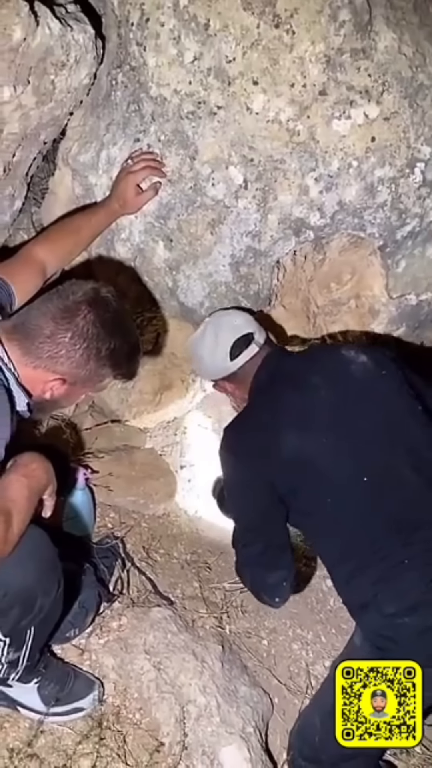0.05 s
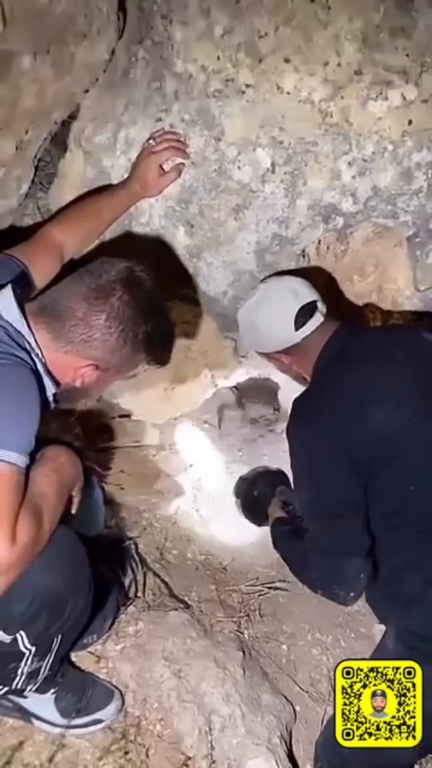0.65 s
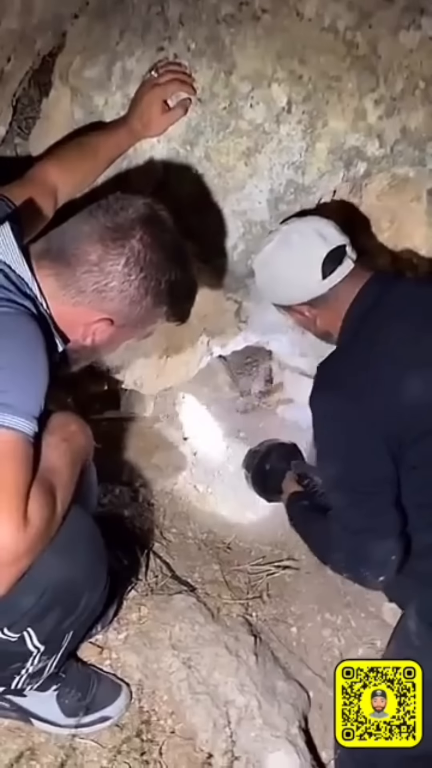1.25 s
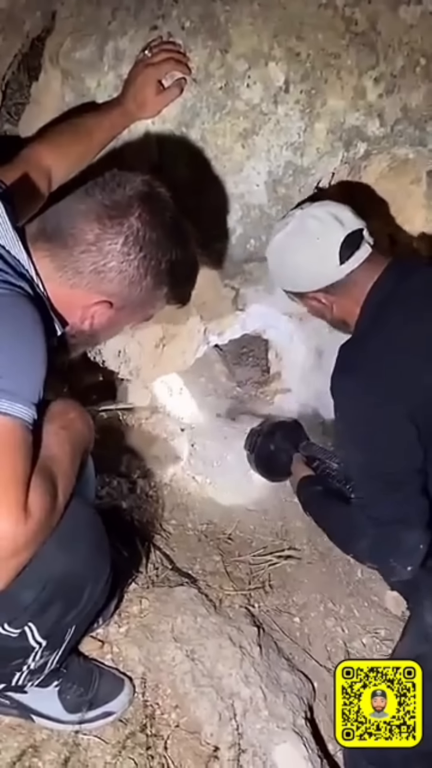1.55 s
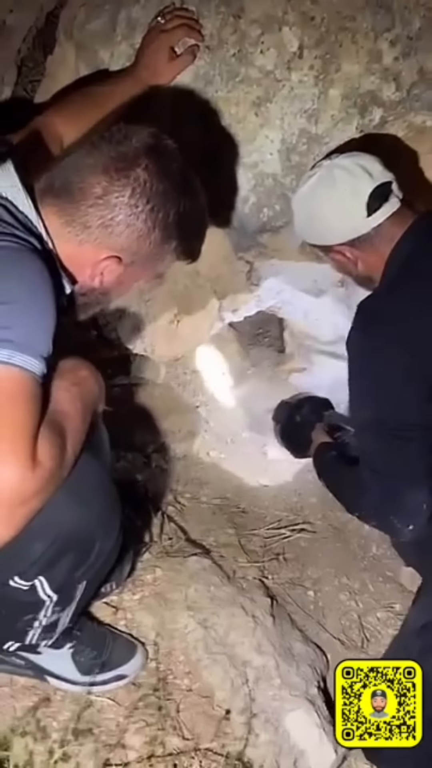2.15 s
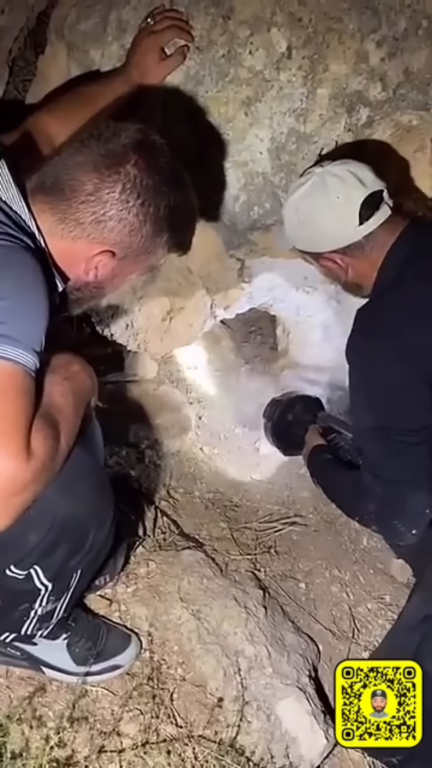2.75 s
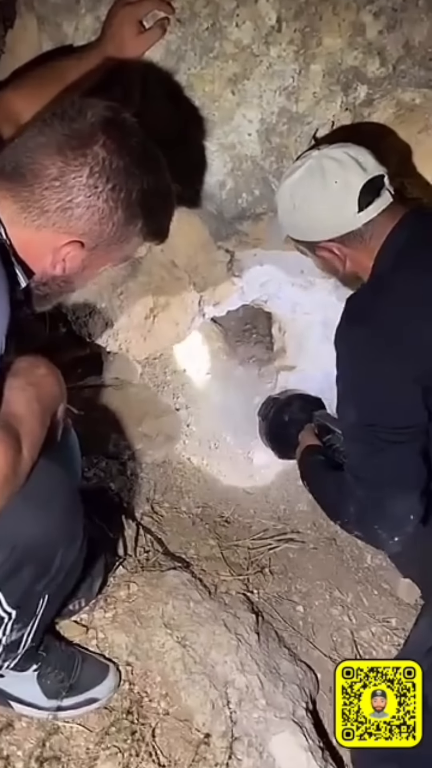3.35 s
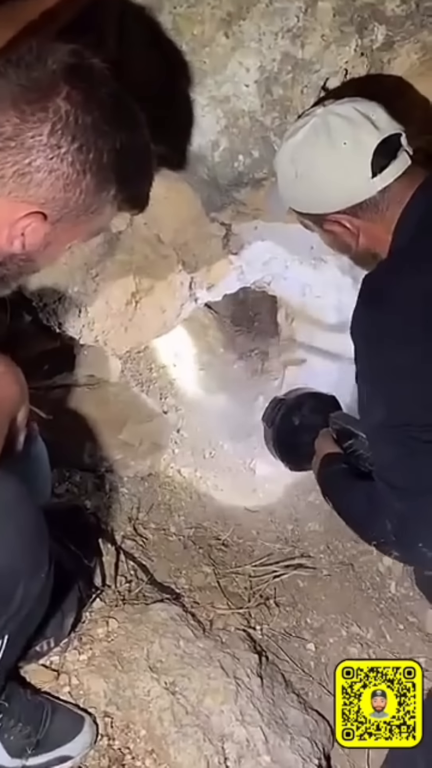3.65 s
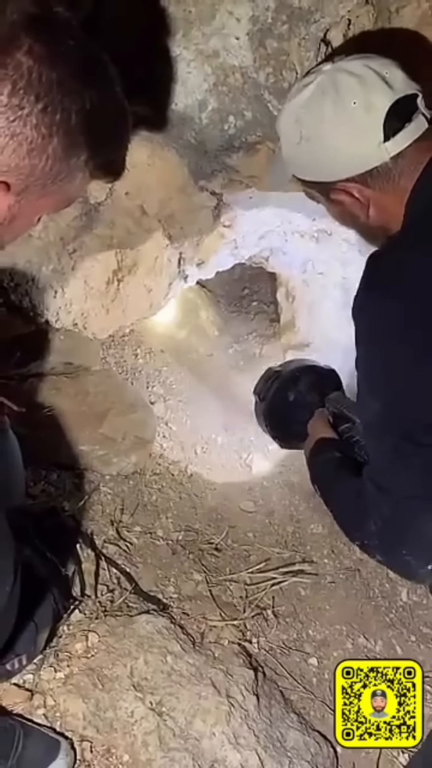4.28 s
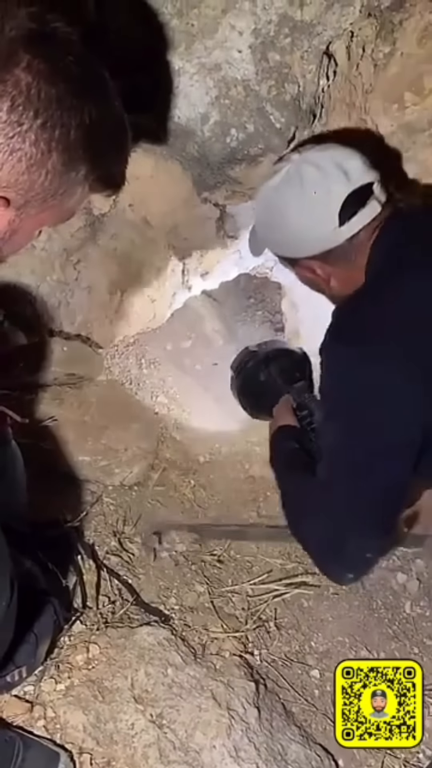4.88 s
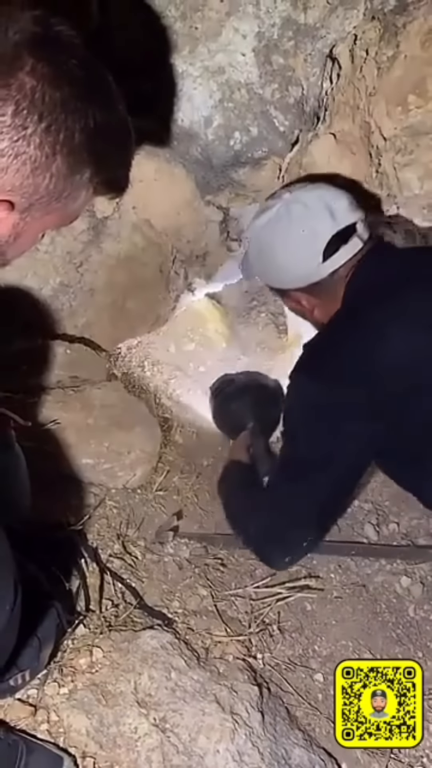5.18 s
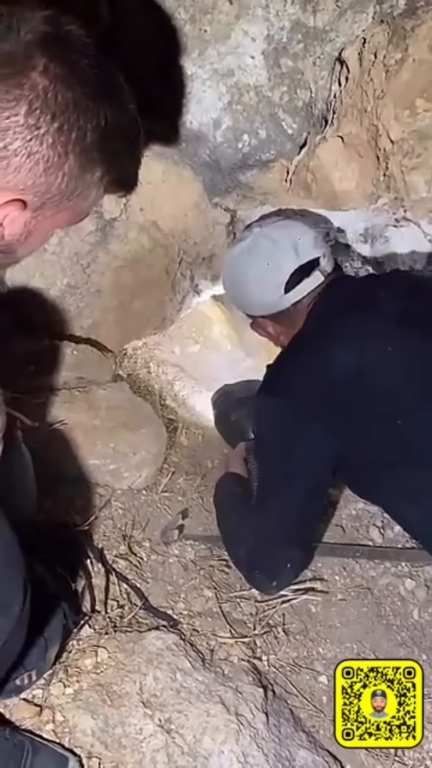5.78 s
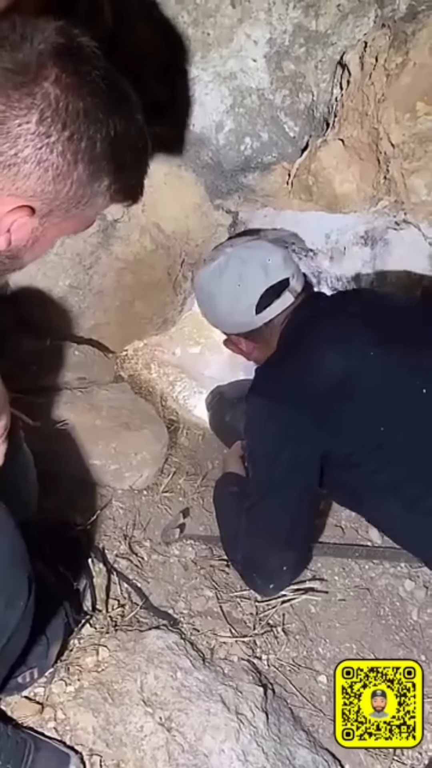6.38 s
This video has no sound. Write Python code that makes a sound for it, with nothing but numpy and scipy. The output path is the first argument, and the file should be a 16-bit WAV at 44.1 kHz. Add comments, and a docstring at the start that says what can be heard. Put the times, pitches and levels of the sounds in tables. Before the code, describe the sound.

A steel bar is worked into an opening in a rock face outdoors. Light scrapes and clinks lead to one sharp knock, then a quick cluster of louder crunching blows with short metallic rings and dull thuds. Softer taps follow, and small stone chips click brightly toward the end. Between the knocks, rubble shifts with a faint low rumble and dry grit trickles. The sound is close and fairly dry.

```python
"""Prying stones from a rock face

Outdoors at night, a steel bar is worked into an opening in the rock. Each knock crushes stone and
excites the bar's bending modes; the heavier ones thud through the ground. Each shove makes the rubble
in the hollow give way and settle; dry grit trickles, chips click and thin flakes ping."""
import sys
import numpy as np
from scipy import signal
from scipy.fft import rfft, irfft, next_fast_len
from scipy.io import wavfile

SR = 44100
rng = np.random.default_rng(int(sys.argv[2]) if len(sys.argv) > 2 else 0)


def store_pcm(level_fs):
    """Save levels as 16-bit WAV."""
    pcm = np.round(np.clip(level_fs, -1, 1) * 32767).astype(np.int16)
    wavfile.write(sys.argv[1], SR, np.atleast_2d(pcm).T)


N = 283456
AGE = np.arange(SR) / SR   # seconds since a blow
SHORT_AGE = AGE[:8192]

# Blows of bar on stone: start_s, crunch_db, crack_db, contact_t60_s, stone_hz, ring_db,
# freedom (0 wedged, 1 free), favoured_hz
BLOWS = [(0.094, -46.5, -43.5, 0.1, 1120, -42, 0.36, 5702),
         (0.148, -36.5, -38, 0.066, 1050, -27.5, 0.19, 1110), (.181, -43, -44, 0.049, 900, -42, 0.13, 1128),
         (0.19, -36.5, -34, 0.037, 1120, -39, 0.2, 4000), (.661, -40.5, -24.5, 0.045, 2240, -41, 0.3, 5300),
         (0.667, -37, -51, .026, 1090, -23.5, 0.03, 2900), (.72, -46, -42.5, 0.076, 1510, -52, 0.37, 2900),
         (0.775, -47.5, -46, 0.037, 1530, -42.5, 0.27, 2204),
         (0.872, -47, -43.5, 0.032, 1310, -41, 0.088, 1629),
         (1.2379, -9.5, -20.5, 0.013, 2300, -37.5, 0.3, 2320),
         (1.367, -43.5, -37, 0.047, 1590, -28, 0.1, 5702), (1.534, -62, -44, 0.062, 2000, -42, 0.1, 4527),
         (1.563, -50, -39.5, 0.032, 1970, -44, .15, 5702), (1.682, -50, -44, .2, 2000, -43, .56, 4527),
         (1.705, -30, -35.5, 0.035, 2200, -43.5, 0.68, 2900),
         (1.748, -47, -37.5, 0.19, 1340, -46, 0.12, 12595),
         (1.763, -32, -61, 0.026, 696, -35.5, 0.17, 1629), (1.856, -68, -43, 0.026, 2000, -43, 0.18, 5702),
         (2.2345, -28, -25, 0.041, 1180, -21.5, 0.4, 6540),
         (2.3532, -27.5, -25, 0.073, 1080, -28.5, 0.25, 1629),
         (2.402, -33.5, -22.5, 0.058, 765, -28.5, 0.11, 3178),
         (2.4146, -16.5, -13.5, 0.027, 2920, -27.5, 0.35, 3178),
         (2.42, -25, -7.5, 0.027, 766, -24, 0.12, 5702),
         (2.47, -31.5, -31.5, 0.09, 1400, -15.5, 0.12, 5930),
         (2.48, -35, -32.5, 0.16, 1250, -40.5, 0.7, 1520),
         (2.5176, -23.5, -29.5, 0.072, 1740, -16.5, 0.16, 1497),
         (2.735, -49, -42.5, 0.16, 1570, -49, 0.22, 1629),
         (2.9988, -19, -21.5, 0.03, 1020, -26.5, 0.18, 2204),
         (3.126, -37, -33.5, .049, 2310, -26.5, 0.13, 2220), (3.847, -56, -35, 0.075, 1500, -53, .12, 5600),
         (3.959, -39.5, -38, 0.078, 1140, -42, .12, 1128),
         (3.987, -48, -29.5, 0.038, 1330, -57, 0.082, 4830), (4.04, -43, -37, 0.027, 840, -49, 0.21, 3010),
         (4.7009, -44.5, -34, 0.34, 2200, -34, 0.21, 4830), (4.7242, -33, -22.5, .05, 2400, -19, .95, 5443),
         (4.865, -44.5, -37, 0.097, 1470, -46.5, 0.71, 3957),
         (5.024, -45.5, -41, 0.15, 1270, -31, 0.24, 7850), (5.051, -43, -38, 0.08, 800, -38, 0.1, 1629),
         (5.259, -54, -54, 0.16, 2090, -61, .07, 2204)]
def knocks():
    """Impact excitation: each blow drives both bodies, so the stone crunches and the steel rings."""
    stone, steel = np.zeros((2, N))
    for start_s, crunch_db, crack_db, contact_t60, stone_hz, ring_db, freedom, favoured_hz in BLOWS:
        add(stone, start_s, contact(crunch_db, crack_db, contact_t60, stone_hz))
        add(steel, start_s, bar_ring(ring_db, freedom, favoured_hz, contact_t60))
    return stone, steel


# Bending modes of the free bar: pitch_hz, level_db, t60_s
BAR_MODES = [(158, -17, 1.5), (715, -15, .3), (904, -14, .95), (1128, -12, .6), (1497, -8, .65),
             (1629, -3, .95), (2204, -8, .5), (2266, -9, .7), (2900, -16, .75), (3010, -15, .5),
             (3178, -9, .38), (3957, -10, .55), (4527, -13, .6), (4830, -7, .36), (5443, -7, .27),
             (5702, 0, .32), (5911, -8, .45), (6236, -7, .25), (6640, -5, .27), (7074, -14, .4),
             (7412, -16, .35), (7850, -10, .42), (8500, -14, .42), (8812, -12, .35), (9080, -10, .4),
             (9776, -10, .18), (10225, -5, .22), (10680, -14, .35), (11400, -14, .2), (12595, -5, .19)]
def bar_ring(ring_db, freedom, favoured_hz, contact_t60):
    """Modal vibration: the contact point favours one mode and its neighbours; the rock damps all."""
    hz, db, t60 = np.transpose(BAR_MODES)
    octaves = np.abs(np.log2(hz / favoured_hz))
    favoured_db, falloff_db = 7, 6.5
    db = np.where(octaves == octaves.min(), favoured_db, db - falloff_db * np.tanh(octaves))
    gain = from_db(db + 2 * rng.standard_normal(len(hz)))
    gain = np.sqrt(2) * from_db(ring_db) * gain / np.linalg.norm(gain)
    freedom = np.clip(freedom, .05, 1)
    hz = hz * (1 + .004 * (1 - freedom) * rng.standard_normal(len(hz)))   # pressure detunes the modes
    age = AGE[:int(freedom * SR)]
    phase = 2 * np.pi * (hz[:, None] * age + rng.random((len(hz), 1)))
    modes = np.sin(phase) * np.exp(-np.log(1000) * age / (freedom * t60[:, None]))
    build_up = 1 - np.exp(-age / (0.13 * max(contact_t60, 1e-3)))
    choke = np.exp(-(age / (.37 * freedom)) ** 6)   # the bar comes to rest on the rock
    return gain @ modes * choke * build_up


def through_bar(spectrum, width_hz, lift_db):
    """Resonant filtering: the pressed bar adds its broadened modes to a spectrum; returns hz, db."""
    points_hz, points_db = np.transpose(spectrum)
    hz = np.arange(points_hz[0], points_hz[-1], 20)
    mode_hz, mode_db, _ = np.transpose(BAR_MODES)
    peak_power = from_db(lift_db + mode_db / 2) ** 2   # the squeeze evens out strong and weak modes
    peaks = peak_power / (1 + (2 * (hz[:, None] - mode_hz) / width_hz) ** 2)
    base_db = np.interp(np.log(hz), np.log(points_hz), points_db)
    return hz, base_db + 10 * np.log10(1 + peaks.sum(axis=1))


# Spectra of the dull crunch and the bright crack: frequency_hz, level_db
CRUNCH_SPECTRUM = [(150, -5.5), (420, -5), (750, 0), (1100, -6), (1550, -7), (2300, -4.5), (2900, -10),
                   (3600, -27.5), (7000, -37.5)]
CRACK_SPECTRUM = [(1500, -23), (3600, -1.5), (4600, -1), (5800, -5), (7500, -0.5), (10000, -3), (13000, 4),
                  (16000, 4)]
def contact(crunch_db, crack_db, t60, stone_hz, stone_db=6, stone_octaves=.2):
    """Brittle fracture: steel crushes the surface in a shower of clicks, coloured by bar and stone."""
    size = len(SHORT_AGE)
    hz, db = through_bar(CRUNCH_SPECTRUM, width_hz=38, lift_db=18)
    resonance_db = stone_db / (1 + (np.log2(hz / stone_hz) / stone_octaves) ** 2)
    dull = np.column_stack([hz, db + resonance_db])
    bright = np.column_stack(through_bar(CRACK_SPECTRUM, width_hz=45, lift_db=20))
    crunch = from_db(crunch_db) * colour(grains(size, per_s=8200, spread_db=2.5), dull)
    crack = from_db(crack_db) * colour(grains(size, per_s=18000, spread_db=5), bright)
    bite = swell(SHORT_AGE, rise_s=0.063 * t60, t60=t60)
    slips = from_db(-23 + 4 * wander(size, per_s=180))   # the point skids on unevenly
    skid = slips * swell(SHORT_AGE, rise_s=.3 * t60, t60=2.5 * t60)
    return (crunch + crack) * (bite + skid)


# Thuds of blows and shifting stones: start_s, level_db, pitch_hz, t60_s
THUD_TONES = [(.148, -38, 193, .06), (0.667, -26.5, 138, 0.039), (0.775, -36.5, 138, .17),
              (.903, -29.5, 98, 0.036), (1.24, -17.5, 251, 0.025), (1.239, -27.5, 800, 0.033),
              (1.383, -35.5, 136, .05), (1.484, -34, 138, .12), (2.237, -32.5, 244, 0.023),
              (2.359, -11.5, 257, 0.024), (2.419, -20, 283, 0.048), (2.427, -18, 127, 0.047),
              (3.0, -20.5, 763, 0.015), (3.004, -13.5, 212, 0.027), (3.033, -33, 153, 0.19),
              (3.133, -29.5, 140, 0.084), (3.183, -31, 60.7, 0.33), (3.272, -28, 56.3, 0.052),
              (3.962, -30.5, 164, 0.091), (4.764, -37, 60.4, 0.45), (5.408, -37, 205, 0.015),
              (6.181, -28, 78.6, 0.076), (6.283, -32, 57, 0.17)]
def thuds():
    """Damped oscillation: blows and shifting stones give short tones, mostly low, a few mid-pitched."""
    out = np.zeros(N)
    for start_s, db, hz, t60 in THUD_TONES:
        tone = np.sin(2 * np.pi * hz * SHORT_AGE)
        add(out, start_s, from_db(db) * tone * swell(SHORT_AGE, rise_s=0.0036, t60=t60))
    return out


# Chips landing on rock: start_s, level_db, pitch_hz, t60_s
CHIP_LANDINGS = [(0.662, -35, 12000, .009), (0.283, -33, 7400, 0.018), (.853, -42, 11300, .011),
                 (1.169, -33, 10100, .015), (3.219, -28.5, 12100, 0.024), (4.365, -25, 12500, .008),
                 (3.8911, -21, 8950, 0.13), (3.893, -31.5, 2180, 0.042), (3.928, -27, 10400, 0.013),
                 (3.992, -28, 11400, 0.055), (4.5377, -29, 12300, 0.03), (4.545, -37.5, 1280, 0.017),
                 (4.741, -10.5, 12300, 0.11), (5.124, -28, 13700, 0.023), (5.164, -22.5, 14300, .022),
                 (5.1833, -31, 14650, 0.031), (5.3825, -11.5, 11900, 0.017)]
def chips():
    """Broad resonance: a small stone snaps, then rattles dryly in the same wide band of noise."""
    out = np.zeros(N)
    for start_s, db, hz, t60 in CHIP_LANDINGS:
        band = [(hz * 0.45, -26), (hz * 0.68, -9), (hz, 0), (hz * 1.66, -10)]
        body = colour(rng.standard_normal(len(SHORT_AGE)), band)
        snap = from_db(db - 3) * swell(SHORT_AGE, rise_s=.0001, t60=0.0012)
        rattle = from_db(db - 8) * swell(SHORT_AGE, rise_s=0.00059, t60=t60)
        add(out, start_s, body * (snap + rattle))
    return out


# Thin, hard flakes being grazed: start_s, level_db, pitch_hz, t60_s, side_modes_db
FLAKE_GRAZES = [(.396, -45, 5912, .23, -12), (1.943, -48, 5911, .24, -12), (1.998, -35.5, 5908, .21, -15),
                (2.099, -41, 6170, .25, -7), (6.173, -38.5, 6161, .27, 0)]
# Modes of a flake: pitch_ratio, level_db
FLAKE_MODES = [(1, 0), (.857, -2), (1.293, -6), (1.466, -8), (1.534, -7), (1.73, -9), (1.852, -5)]
def pings():
    """Inharmonic plate modes: a grazed flake scratches and rings, its higher modes dying sooner."""
    out = np.zeros(N)
    for start_s, db, hz, t60, side_db in FLAKE_GRAZES:
        add(out, start_s, contact(db - 17, db - 5, t60=.07, stone_hz=1500))
        for ratio, mode_db in FLAKE_MODES:
            gain = from_db(db + mode_db + side_db * (ratio != 1))
            envelope = swell(AGE, rise_s=0.0032, t60=t60 / np.sqrt(ratio))
            add(out, start_s, gain * np.sin(2 * np.pi * hz * ratio * AGE) * envelope)
    return out


# Rubble giving way and settling: start_s, rumble_db, gravel_db, rumble_t60_s
RUBBLE_SHIFTS = [(0, -48, -56.5, 0.94), (0.141, -37.5, -53.5, 0.3), (.665, -36, -49, 0.31),
                 (0.768, -37.5, -53, 0.66), (1.24, -41.5, -64, 0.22), (1.374, -43, -56, 0.43),
                 (1.478, -43.5, -52.5, 0.94), (1.719, -41, -55, 0.22), (1.995, -63, -61.5, 0.94),
                 (2.37, -38.5, -44, 0.24), (2.45, -36.5, -46, 0.5), (2.65, -56.5, -57, 0.95),
                 (3.0, -41, -53.5, 0.83), (3.17, -47, -55, 0.95), (3.84, -48.5, -52.5, 1),
                 (3.958, -38, -52.5, .7), (4.23, -70, -56.5, 1.0), (4.728, -40, -55, 0.28),
                 (4.86, -54.5, -51, 0.47), (5.408, -54, -56.5, 0.12), (5.478, -48.5, -60.5, 0.43),
                 (5.58, -47, -63.5, 0.38), (5.69, -51, -61, 0.55), (5.84, -57, -60.5, 1.0),
                 (6.26, -51, -58.5, 1)]
# Spectra of the rumbling hollow and the gravel: frequency_hz, level_db
HOLLOW_SPECTRUM = [(25, -34.5), (45, 0.5), (65, 3.5), (85, -2), (105, 1.5), (150, -3.5), (185, -3.5),
                   (235, -8), (300, -9.5), (420, -21), (800, -58.5)]
GRAVEL_SPECTRUM = [(150, 7.5), (400, 2.5), (800, 6.5), (1200, 1.5), (1700, 0.5), (2500, -4), (3600, -8.5),
                   (6000, -6)]
def rubble(spurts, rise_s=0.0044, rest_rumble_db=-65.5, rest_gravel_db=-66.5):
    """Incoherent sources add in power: each shift rumbles in the hollow, and its gravel runs on."""
    rumble_power = np.full(N, from_db(rest_rumble_db) ** 2)
    gravel_power = np.full(N, from_db(rest_gravel_db) ** 2)
    for start_s, rumble_db, gravel_db, t60 in RUBBLE_SHIFTS:
        add(rumble_power, start_s, (from_db(rumble_db) * swell(AGE, rise_s, t60)) ** 2)
        add(gravel_power, start_s, (from_db(gravel_db) * swell(AGE, rise_s, 2.02 * t60)) ** 2)
    rumble = from_db(0.5) * colour(rng.standard_normal(N), HOLLOW_SPECTRUM)
    gravel = from_db(1.7 * spurts) * colour(grains(N, per_s=4900, spread_db=0), GRAVEL_SPECTRUM)
    return np.sqrt(rumble_power) * rumble + np.sqrt(gravel_power) * gravel


# The slowly changing trickle: time_s, level_db
TRICKLE_LEVELS = [(0.0, -56.5), (0.3, -49), (0.5, -56.5), (1.25, -50.5), (1.47, -53), (2.15, -51),
                  (2.58, -50.5), (2.86, -56), (3.24, -50), (3.7, -59), (3.88, -60), (4.03, -50.5),
                  (4.78, -54), (4.96, -50.5), (5.49, -63), (5.98, -59), (6.3, -49), (6.43, -55)]
# Pockets of grit emptying in one swell: start_s, length_s, level_db
GRIT_POURS = [(0.15, 0.17, -45.5), (1.9, 0.28, -45), (4.26, 0.17, -45.5), (4.809, 0.12, -40),
              (5.004, 0.11, -43.5)]
# Spectrum of grit on rock: frequency_hz, level_db
GRIT_SPECTRUM = [(1500, -15), (3500, -12.5), (5500, -6), (8000, -4.5), (10500, 0), (13000, 2.5),
                 (16000, -1)]
def grit(spurts, trickle_gain_db=2, crumbs_db=-12):
    """Granular flow: dense tiny impacts merge into a hiss, and stray larger crumbs tick out of it."""
    flow_db = np.interp(np.arange(N) / SR, *np.transpose(TRICKLE_LEVELS))
    power = from_db(flow_db + trickle_gain_db) ** 2
    for start_s, length_s, db in GRIT_POURS:
        add(power, start_s, from_db(db) ** 2 * np.hanning(int(length_s * SR)))
    hiss = from_db(2 * spurts) * colour(grains(N, per_s=9000, spread_db=2.8), GRIT_SPECTRUM)
    crumbs = from_db(crumbs_db) * colour(grains(N, per_s=70, spread_db=3), GRIT_SPECTRUM)
    return np.sqrt(power) * (hiss + crumbs)


def rock_face(x, level_db, t60):
    """Diffuse reflection: the uneven rock scatters back a short, dull copy of the sound."""
    spectrum = [(100, -11.5), (2500, 3.5), (6000, 0.5), (16000, -37.5)]
    scatter = colour(rng.standard_normal(len(SHORT_AGE)), spectrum)
    scatter *= swell(SHORT_AGE, rise_s=0.0015, t60=t60)
    return from_db(level_db) * signal.fftconvolve(x, scatter / np.linalg.norm(scatter))[:N]


def grains(size, per_s, spread_db):
    """Shot noise: random tiny impacts, mostly weak and a few strong."""
    strength = from_db(spread_db * np.minimum(rng.exponential(1, size), 5))
    return strength * rng.choice([-1, 1], size) * (rng.random(size) < per_s / SR)


def colour(x, spectrum):
    """Spectral shaping by (hz, db) points, rolling off beyond both ends; rms 1."""
    size = next_fast_len(len(x))
    hz, db = np.transpose(spectrum)
    log_hz = np.log(np.arange(size // 2 + 1) * SR / size + 1)
    beyond = np.abs(log_hz - np.clip(log_hz, np.log(hz[0]), np.log(hz[-1])))
    gain = from_db(np.interp(log_hz, np.log(hz), db)) * np.exp(-2 * beyond)
    shaped = irfft(rfft(x, size) * gain, size)[:len(x)]
    return shaped / np.sqrt(np.mean(shaped ** 2) + 1e-20)


def swell(age, rise_s, t60):
    """Exponential decay after a quick rise; peak 1."""
    shape = (1 - np.exp(-age / max(rise_s, 1e-5))) * np.exp(-np.log(1000) * age / max(t60, 1e-3))
    return shape / shape.max()


def wander(size, per_s):
    """Random modulation: straight lines between values of unit spread."""
    knots = rng.standard_normal(int(size / SR * per_s) + 2)
    return np.interp(np.arange(size) / SR * per_s, np.arange(len(knots)), knots)


def from_db(db):
    """Decibels to amplitude ratio."""
    return 10 ** (np.asarray(db) / 20)


def add(out, start_s, sound):
    """Superpose a sound from start_s on."""
    start = int(np.clip(start_s * SR, 0, N - 1))
    out[start:start + len(sound)] += sound[:N - start]


def scene():
    """Superposition: the blows and their reflection sound over the sliding debris."""
    stone, steel = knocks()
    hits = stone + chips()
    impacts = hits + rock_face(hits, level_db=-20, t60=.09) + steel + pings() + thuds()
    spurts = wander(N, per_s=36)   # gravel and grit surge together
    return (impacts + rubble(spurts) + grit(spurts))[None]


def record(dry, low_hz=32, high_hz=15900, ceiling=.65):
    """Band limiting and saturation: the microphone loses deep bass and top treble, and rounds peaks."""
    thinned = signal.sosfilt(signal.butter(2, low_hz, "high", fs=SR, output="sos"), dry)
    rounded = ceiling * np.tanh(thinned / ceiling)
    return signal.sosfilt(signal.ellip(10, .2, 70, high_hz, fs=SR, output="sos"), rounded)


dry = scene()
out = record(dry)
store_pcm(out)
```